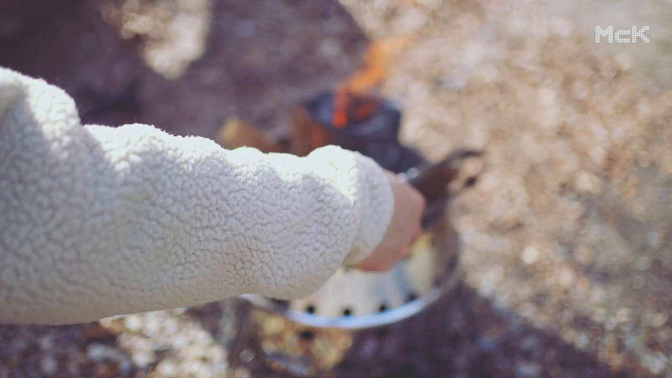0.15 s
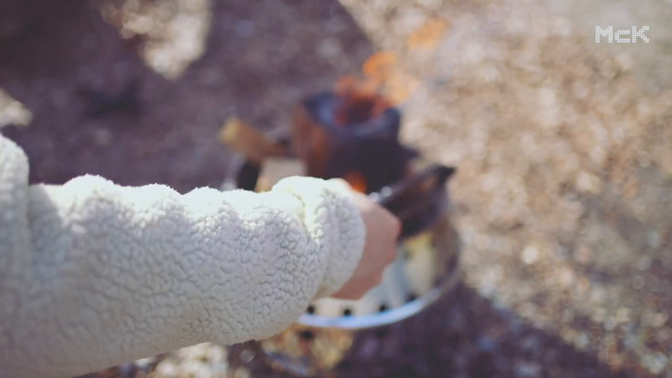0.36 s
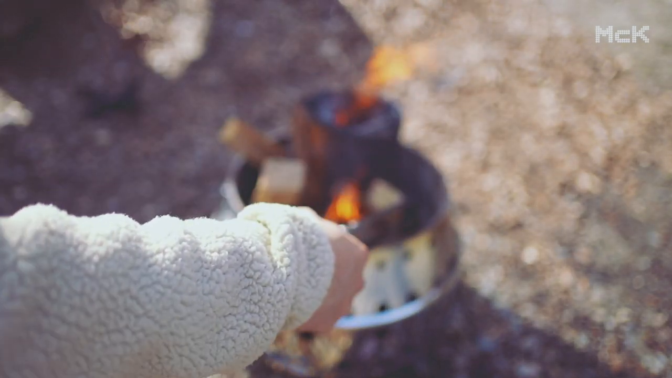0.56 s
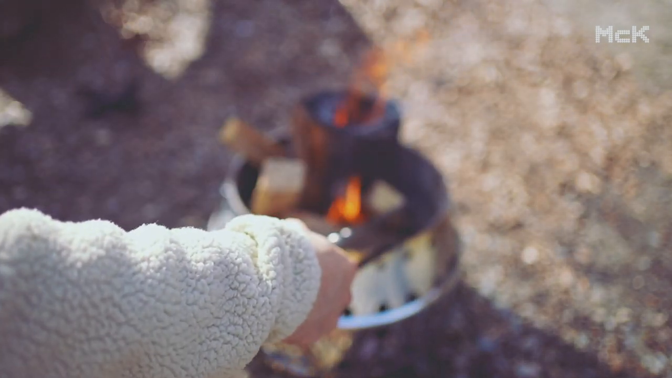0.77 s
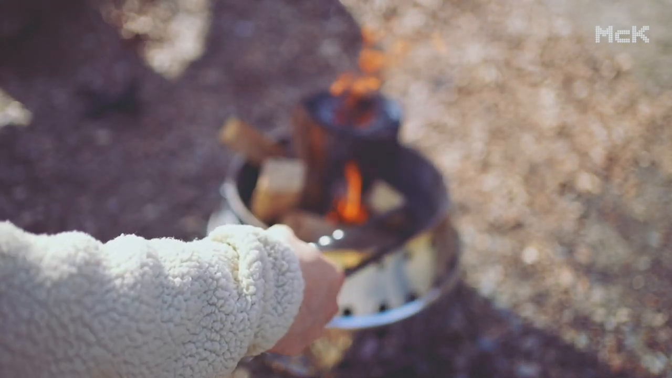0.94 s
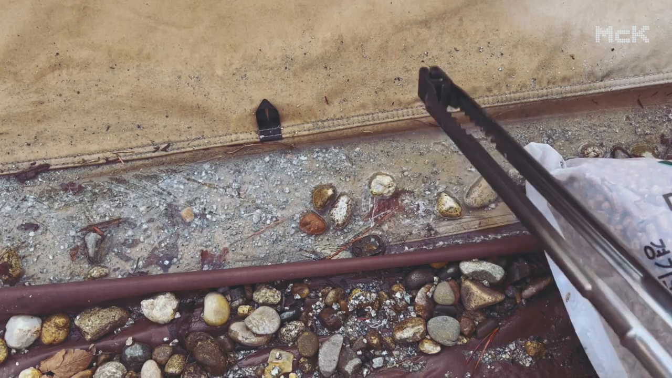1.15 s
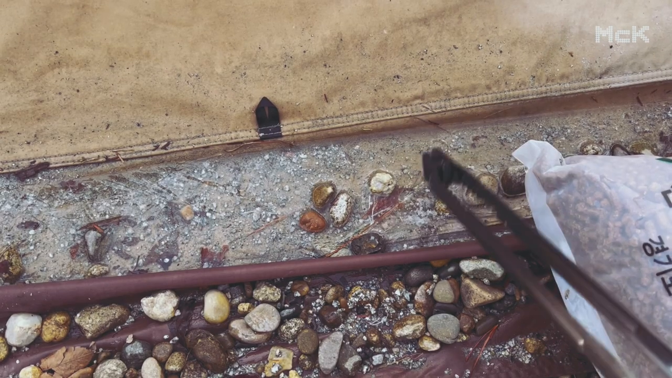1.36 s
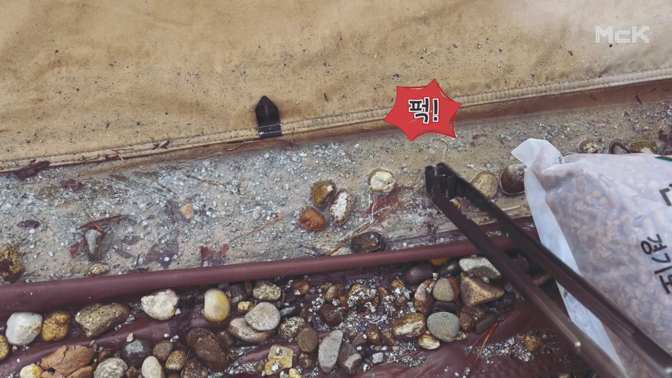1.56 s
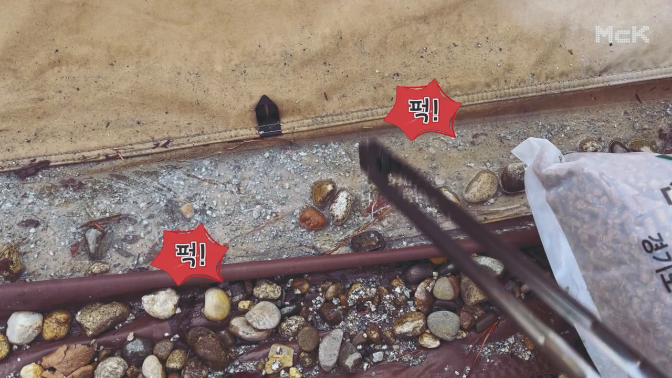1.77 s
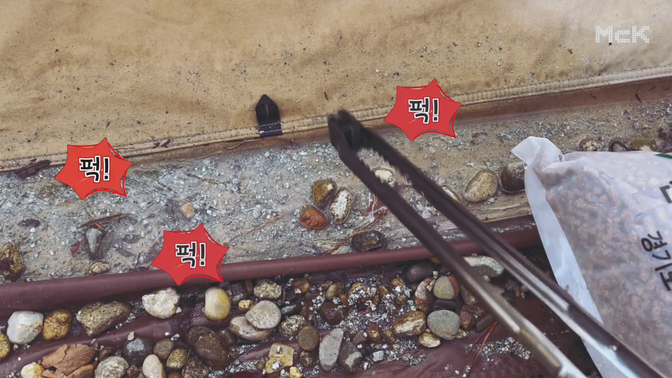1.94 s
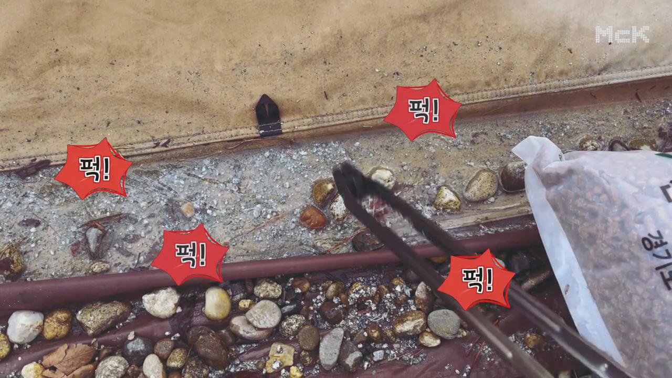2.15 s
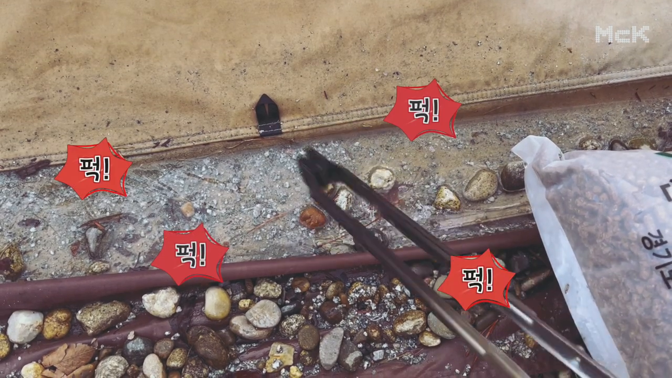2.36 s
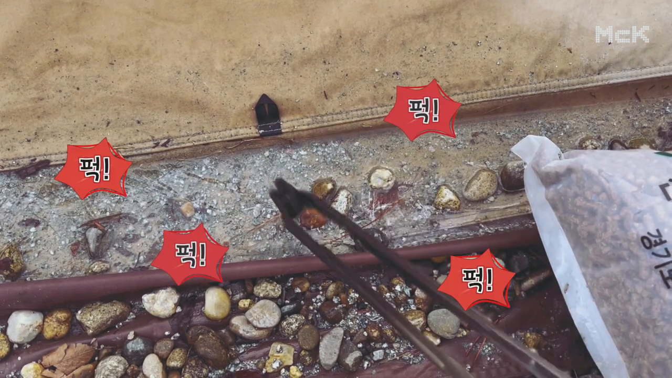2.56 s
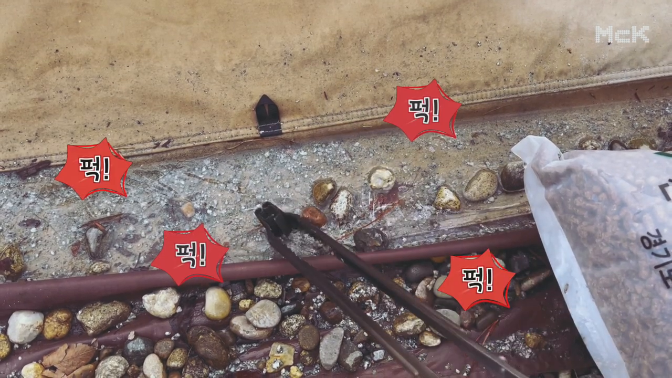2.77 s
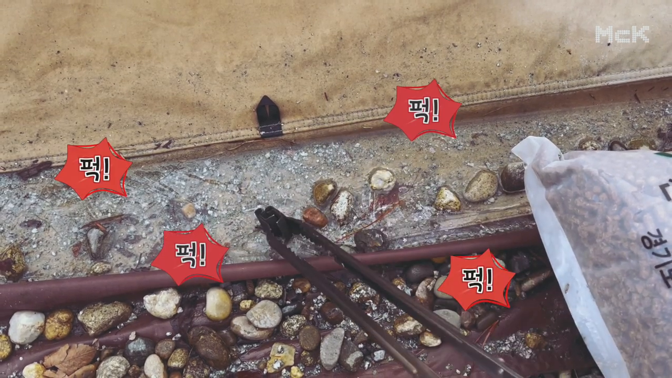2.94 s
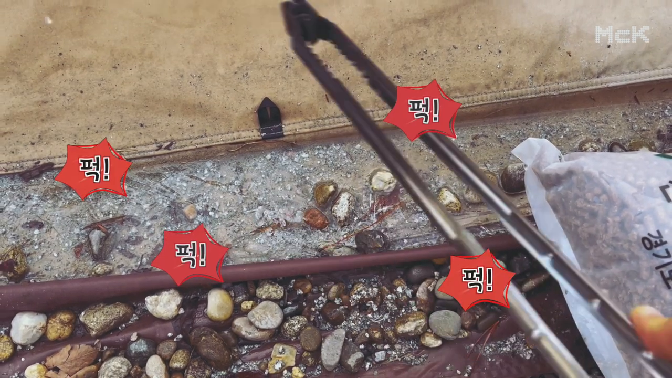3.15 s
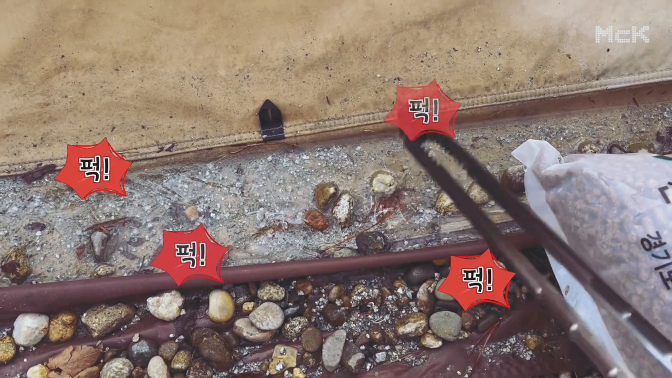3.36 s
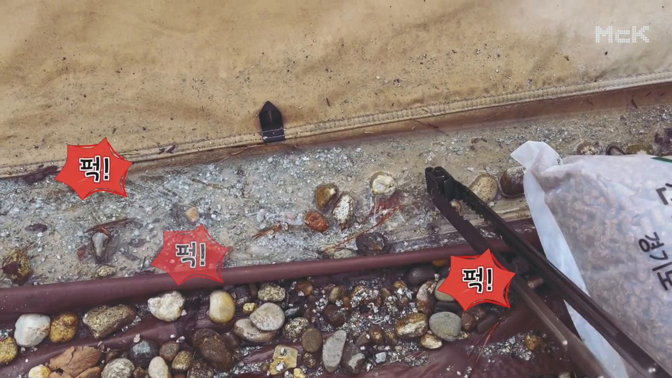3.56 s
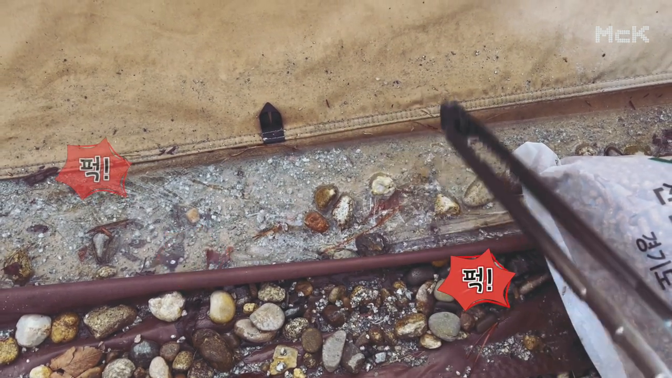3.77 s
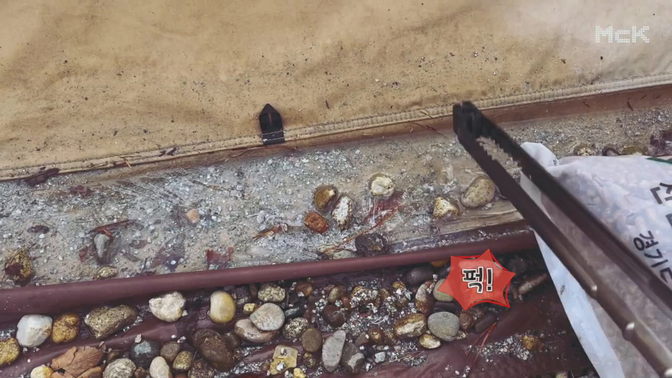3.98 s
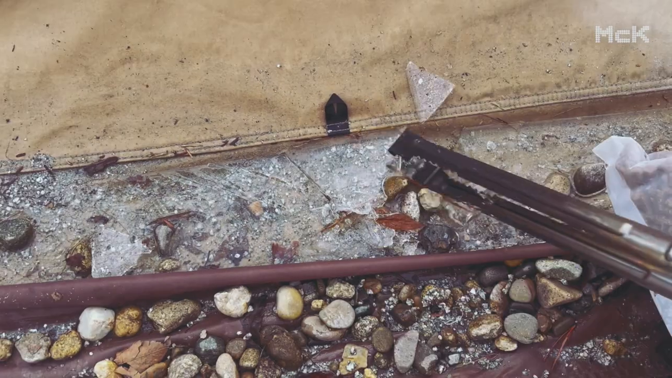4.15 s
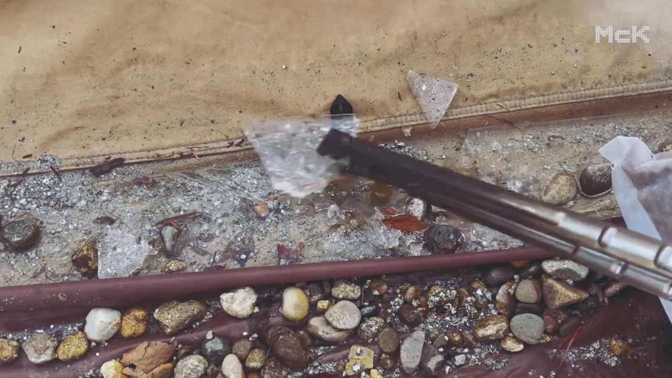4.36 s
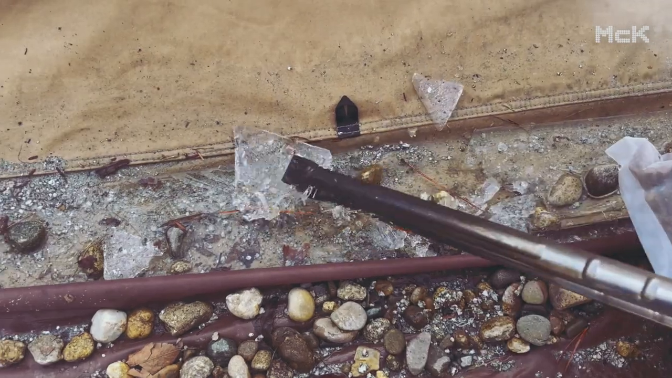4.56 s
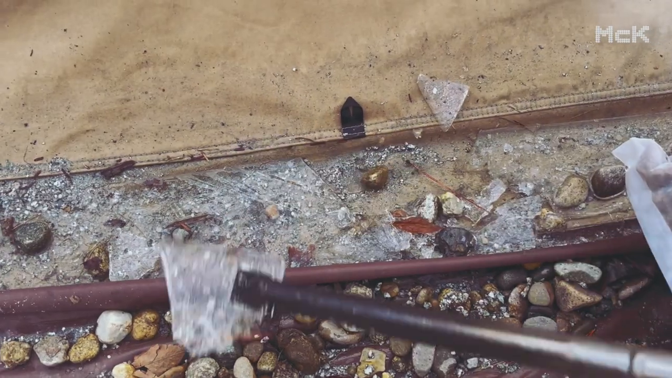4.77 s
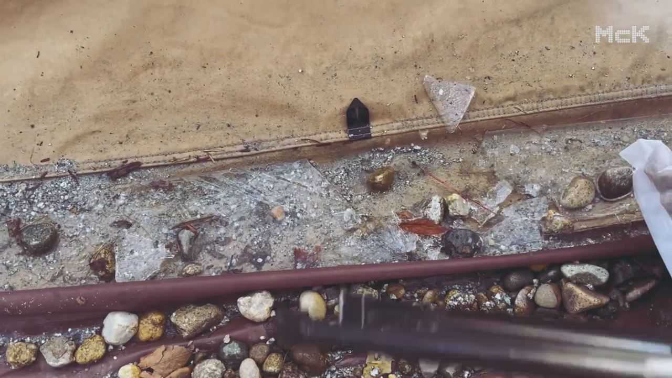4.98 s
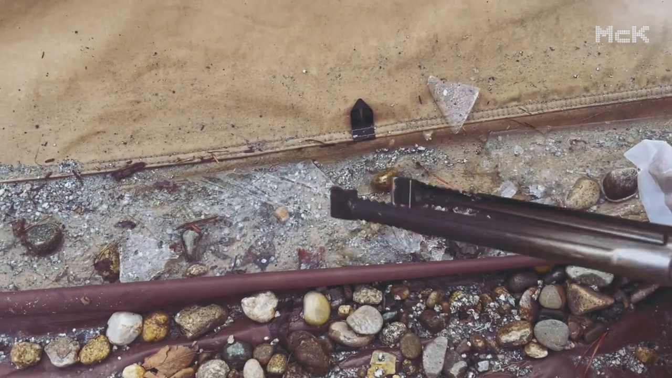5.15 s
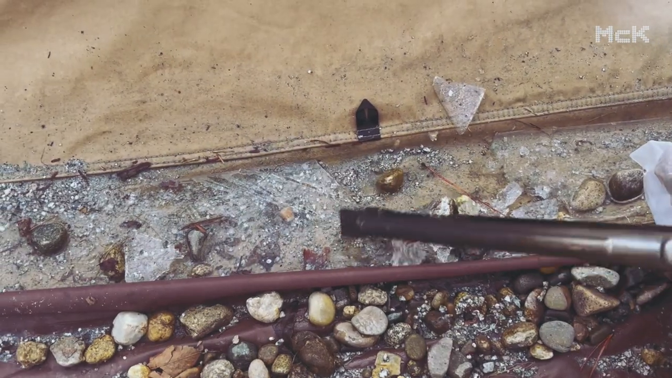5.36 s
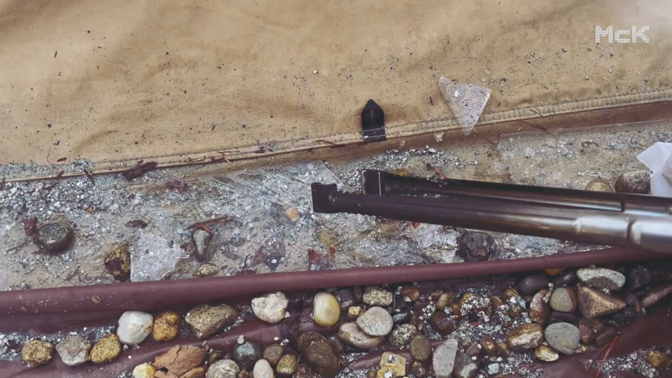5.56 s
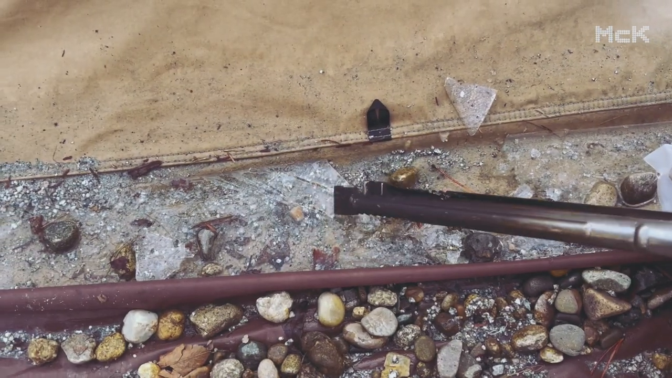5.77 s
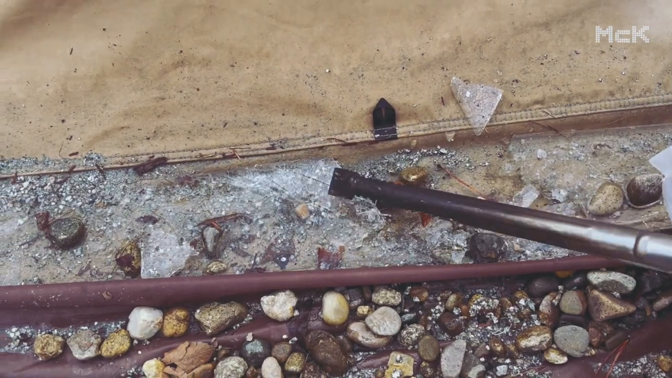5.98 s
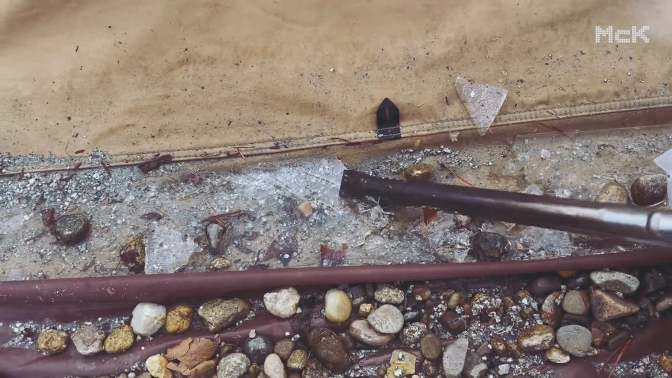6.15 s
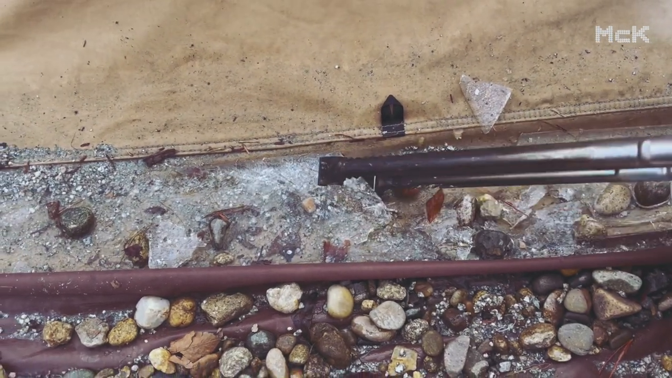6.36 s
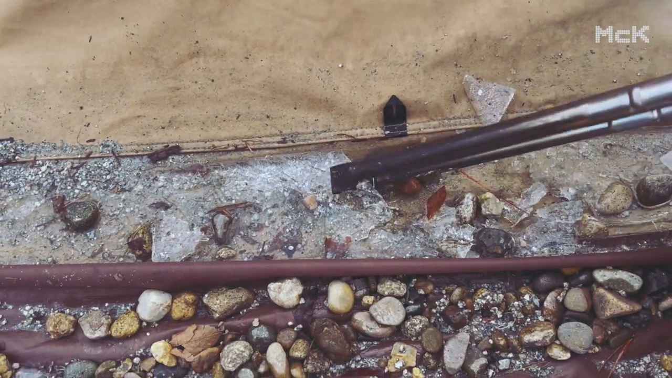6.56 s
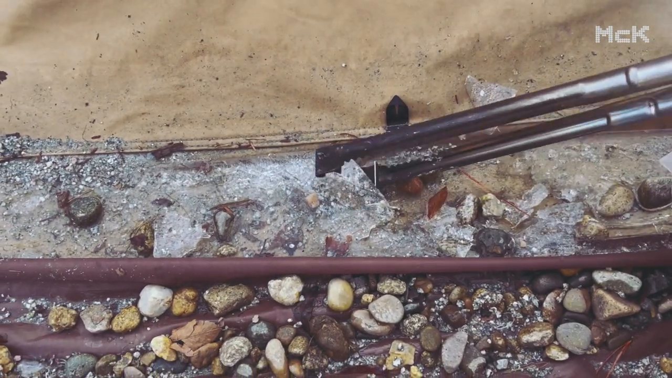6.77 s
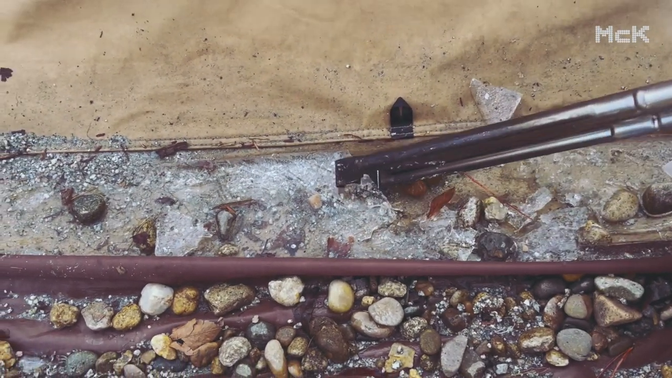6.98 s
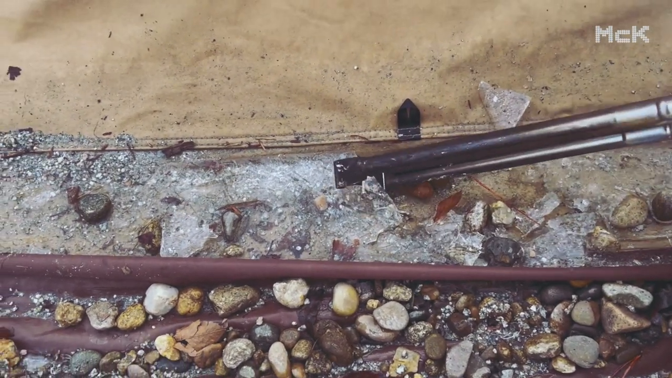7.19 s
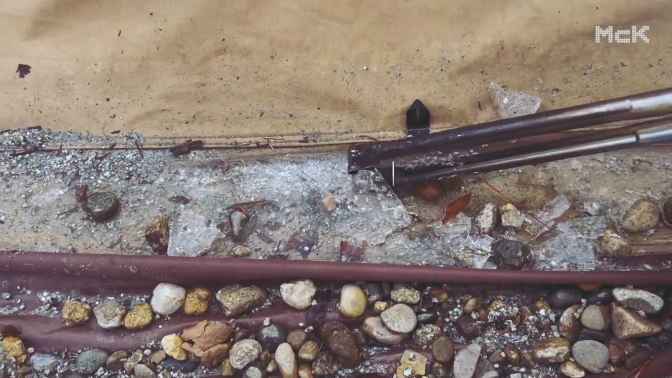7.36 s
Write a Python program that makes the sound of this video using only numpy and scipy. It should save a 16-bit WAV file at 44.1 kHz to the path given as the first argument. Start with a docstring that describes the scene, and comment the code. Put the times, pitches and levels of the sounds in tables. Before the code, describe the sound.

A small wood fire outdoors burns in the centre throughout, with low soft rumble, faint hiss and irregular pops; the sharpest snaps come near 1.9 and 6.3 seconds. From 0.15 to 0.7 steel tongs stir charcoal in a metal stove: short dry rasps with hollow, sliding notes, and one high clink at 0.26. From 1.13 to 3.74 the tongs strike ice close by, slightly right: bright, hard, quickly damped clacks roughly every quarter second, each with tiny chattering rebounds, an icy crack and a small ground thud. From 4.1 the action turns to raking: crunchy scrape and clicks until 4.4, a cracking nudge and slippery squeak around 4.8 to 5.05, gritty scrapes to 5.8, a clearer tick and crunch near 6.1, then faint scraping and small icy ticks to the end at about 7.4. Close stereo microphone, dry, with slight bright scatter from tent fabric.

```python
"""Stove fire and tongs on ice

A wood fire rumbles, hisses and pops dead centre throughout: shaped noise and short noise bursts.
Steel tongs first stir the stove, by stick-slip friction through hollow resonances, and clink once.
They then knock a strip of ice apart along a tent edge, by impacts on damped modes, and rake the shards
by friction on the same modes. The ice work is near, a little to the right, with the tent wall's scatter.
"""
import sys
import numpy as np
from scipy import signal
from scipy.fft import rfft, irfft, next_fast_len
from scipy.io import wavfile
from scipy.ndimage import uniform_filter1d, map_coordinates

SR = 44100
rng = np.random.default_rng(int(sys.argv[2]) if len(sys.argv) > 2 else 0)


def unload_audio(sound):
    """Save the sound as a 16-bit wav file, at the path given as the first command line argument."""
    columns = np.transpose(np.atleast_2d(sound))
    # keep every value between -1 and 1, then stretch to whole-number steps
    steps = np.round(np.clip(columns, -1, 1) * 32767)
    wavfile.write(sys.argv[1], SR, steps.astype(np.int16))


N = 327222
AFTER = np.arange(SR // 8) / SR  # seconds after an impact
FRONT = 260  # samples, about 6 ms, over which an impact has rms 1
TAIL_DB = -28  # level of the slow tail in every burst


def amp(db):
    """Decibel law: level to amplitude ratio."""
    return 10 ** (np.asarray(db) / 20)


def unit(x):
    """Normalisation to rms 1."""
    return x / np.sqrt(np.mean(x ** 2) + 1e-20)


def along(points, hz):
    """Logarithmic frequency scale: interpolate (Hz, value) points along it."""
    f, v = np.transpose(points)
    return np.interp(np.log(hz + 1), np.log(f + 1), v)


def curves(rows):
    """Level envelope: one gain per sample from (s, dB) rows."""
    s, db = np.transpose(rows)
    return amp(np.interp(np.arange(N) / SR, s, db))


def wobble(rate):
    """Slow random modulation: a smooth curve with rate knots a second."""
    knots = rng.standard_normal(int(N * rate / SR) + 4)
    return map_coordinates(knots, [np.arange(N) * rate / SR])


def filtered(x, response):
    """Linear filtering: the spectrum of x times a complex response of frequency."""
    m = next_fast_len(N + 8192)
    return irfft(rfft(x, m) * response(np.fft.rfftfreq(m, 1 / SR)), m)[..., :N]


def resonant(modes):
    """Modal superposition: the causal response of (Hz, width Hz, dB) resonances with alternating signs."""
    def response(f):
        total = 0
        for k, (hz, width, db) in enumerate(modes):
            total = total + (-1) ** k * amp(db) * 1j * f * width / (hz * hz - f * f + 1j * f * width)
        return total
    return response


def grit(rate, spread_db, rub=0):
    """Stick-slip friction: uneven random slips, rate a second, over a share of steady rubbing noise."""
    sizes = amp(spread_db * np.minimum(rng.exponential(size=N), 2.5))
    slips = (rng.random(N) < rate / SR) * sizes
    envelope = unit(signal.lfilter([1], [1, -.975], slips)) + abs(rub)
    return unit(envelope * rng.standard_normal(N))


def burst(lo_hz, hi_hz, t60):
    """Transient decay: a band of noise with a spiky front, a body dying in t60 and a weak slow tail."""
    spike = amp(7 - 60 * AFTER / 0.0025)
    body = amp(-60 * AFTER / t60)
    tail = amp(TAIL_DB - 60 * AFTER / 0.14)
    shape = (spike + body + tail) * (1 - np.exp(-AFTER / 0.00023))
    band = signal.butter(2, [lo_hz, min(hi_hz, .45 * SR)], "bandpass", fs=SR, output="sos")
    x = signal.sosfilt(band, shape * rng.standard_normal(len(AFTER)))
    return x / np.sqrt(np.mean(x[:FRONT] ** 2))


def ringing(modes, spread_db, detune):
    """Modal decay: damped (Hz, dB, t60) modes; grip and spot struck weight and shift each one anew."""
    x = 0
    for hz, db, t60 in modes:
        envelope = amp(db + rng.normal(0, spread_db) - 60 * AFTER / t60)
        x = x + envelope * np.sin(2 * np.pi * hz * rng.normal(1, detune) * AFTER)
    x = x * (1 - np.exp(-AFTER / 0.00013))
    return x / np.sqrt(np.mean(x[:FRONT] ** 2))


def patchy(x, depth_db):
    """Time-varying filtering: a random gain field over time and frequency keeps the colour changing."""
    z = signal.stft(x, nperseg=256)[2]
    field = uniform_filter1d(rng.standard_normal(z.shape), size=6, axis=0)
    field = uniform_filter1d(field, size=8, axis=1)
    return unit(signal.istft(z * amp(depth_db * unit(field)), nperseg=256)[1][:N])


def strokes(rows, sag_db, fade):
    """Friction envelope: quick bite, sag, then decay with time constant fade; one per dB column."""
    t, gains = np.arange(N) / SR, 0
    for start, end, *db in rows:
        shape = np.clip((t - start) / 0.017, 0, 1) * np.exp(-np.clip(t - end, 0, None) / fade)
        sag = amp(-sag_db * np.clip((t - start) / (end - start), 0, 1))
        gains = gains + np.outer(amp(db), shape * sag)
    return gains


def add(track, s, sound):
    """Superposition: mix a sound into the track at s seconds."""
    track[round(s * SR):][:len(sound)] += sound


def wide_floor():
    """Uncorrelated noise: a faint wide low rumble and a narrow 10 kHz hiss, left and right, from 1.11 s."""
    floor = filtered(rng.standard_normal((2, N)), resonant([(90, 230, 4.5), (10400, 1300, -2)]))
    return amp(-66.5) * unit(floor) * (np.arange(N) > 1.11 * SR)


# Clear fire pops. Each row: start in seconds, snap level in dB, brightness in dB against the snap.
FIRE_POPS = [(0.1144, -30, -5), (0.2015, -39, -13.5), (0.365, -50, -44), (0.5503, -48, 10),
             (0.5945, -38.5, 8), (0.919, -37.5, 1), (0.9746, -36.5, -8.5), (1.082, -28.5, -15.5),
             (1.1985, -47.5, 4), (1.228, -39.5, -14.5), (1.2826, -37, 5.5), (1.389, -49.5, 2.5),
             (1.4662, -33, -16.5), (1.665, -39.5, 7.5), (1.7634, -26.5, -4), (1.818, -46, 0.5),
             (1.9084, -14.5, -2.5), (2.099, -29.5, 3.5), (2.121, -46.5, 9), (2.4394, -28, -7),
             (2.457, -48, 5.5), (2.7587, -42.5, -3), (2.8483, -47.5, 15.5), (2.987, -25, -1),
             (3.055, -42, -7.5), (3.3011, -48.5, -4.5), (3.341, -47, 1.5), (3.353, -44.5, 3),
             (3.852, -39, 0.5), (3.8936, -35.5, -0.5), (3.9637, -45.5, -17), (3.984, -40, 2.5),
             (4.519, -29.5, -29.5), (4.619, -41, -8), (4.738, -36.5, -8), (4.895, -40, 6),
             (4.9029, -39.5, 3.5), (5.0653, -36, -6.5), (5.097, -23.5, 0), (5.4542, -30.5, -6),
             (5.914, -42.5, -7), (6.193, -39.5, -15.5), (6.3387, -16.5, -5.5), (6.3812, -26, -0.5),
             (6.404, -29.5, -1.5), (6.534, -51, -49), (6.5982, -35, -5), (6.745, -41.5, 4.5),
             (7.0045, -36, 3), (7.2645, -41, -25)]
# Flame strength. Each row: time in seconds, rumble level in dB.
FLAME_LEVEL = [(0.0, -47.5), (7.42, -42.5)]
# Spectrum of the flame rumble. Each row: frequency in Hz, relative density in dB per Hz.
RUMBLE_SPECTRUM = [(15, -45), (25, -12.5), (59, 1.5), (98, 2.5), (400, -19.5), (880, -120)]
# Spectrum of the fire hiss. Each row: frequency in Hz, relative density in dB per Hz.
HISS_SPECTRUM = [(180, -23), (300, -9), (758, -12.5), (927, -21.5), (2630, -28), (15200, -39.5),
                 (16800, -58)]


def fire():
    """Impulsive radiation: bursting wood pockets snap over noise-shaped rumble, hiss and fine crackle."""
    pops = np.zeros(N + SR)
    for s, snap_db, bright_db in FIRE_POPS:
        add(pops, s, amp(snap_db) * burst(1370, 5370, 0.015))
        add(pops, s, amp(snap_db + bright_db) * burst(4100, 11900, 0.0089))
        thump_db = snap_db - 8.0 - 0.56 * bright_db  # dull pops thump more
        add(pops, s, amp(thump_db) * burst(355, 873, 0.016))
    rumble = unit(filtered(rng.standard_normal(N), lambda f: amp(along(RUMBLE_SPECTRUM, f))))
    hiss = filtered(rng.standard_normal(N), lambda f: amp(along(HISS_SPECTRUM, f)))
    crackle = filtered(grit(rate=36, spread_db=9.5), resonant([(5040, 4700, 0)]))
    out = pops[:N] + curves(FLAME_LEVEL) * rumble
    out += amp(-54.0) * patchy(hiss, depth_db=5.0)
    return out + amp(-57.5) * patchy(crackle, depth_db=0.5)


# Strokes of the tongs in the stove. Each row: start in seconds, end in seconds, rasp level in dB,
# hollow note level in dB, hollow pitch in Hz, resonance width in Hz; levels are before the sag.
STOVE_STROKES = [(0.146, 0.166, -69, -33, 1640, 91.5), (0.195, 0.235, -43, -32, 1660, 130),
                 (0.226, 0.28, -40.5, -29.5, 1510, 1530), (0.487, 0.6, -39, -67, 1110, 900),
                 (0.571, 0.641, -36.5, -29, 1070, 302)]
# Spectrum of steel on charcoal. Each row: frequency in Hz, relative level in dB.
RASP_SPECTRUM = [(1500, -9), (15800, -18.5), (16800, -89)]
# Modes of the tongs, lowest first. Each row: frequency in Hz, relative level in dB.
STEEL_MODES = [(5405, 2), (6400, -11.5), (7100, -6.5), (8560, -1), (8860, 0.5), (9480, -3.5), (9938, 8),
               (11030, 7.5), (11400, 6), (14400, -5)]
CLINK_S, CLINK_DB = .2553, -20  # the tongs touch the stove rim


def stirring():
    """Friction-driven resonance: steel rasps on charcoal, the shell answers hollow, the tongs clink once."""
    rasp = filtered(grit(rate=890, spread_db=-4.5, rub=2.6), lambda f: amp(along(RASP_SPECTRUM, f)))
    rasp_gain = strokes([row[:3] for row in STOVE_STROKES], sag_db=11.5, fade=0.1)[0]
    out = rasp_gain * patchy(rasp, depth_db=1.5)
    for start, end, _, db, hz, width in STOVE_STROKES:
        shell = resonant([(hz, width, 0), (hz, hz, -14)])
        note = filtered(grit(rate=230, spread_db=-19.0, rub=1.6), shell)
        out += strokes([(start, end, db)], sag_db=14.5, fade=0.035)[0] * unit(note)
    ring = ringing([(hz, db, .08) for hz, db in STEEL_MODES[1:]], spread_db=8, detune=0.0034)
    add(out, CLINK_S, amp(CLINK_DB) * (burst(10000, 17000, .06) + 0.38 * ring))
    return out


# Strokes through the shards, and one long faint bed of scraping under the later ones. Each row: start in
# seconds, end in seconds, crunch level in dB before the wobble, steel rasp in dB against the crunch.
SHARD_STROKES = [(4.097, 4.253, -42.5, 2), (4.306, 4.408, -49, -3), (4.79, 5.063, -55, 2.5),
                 (5.125, 5.159, -42.5, 1.5), (5.234, 5.467, -48.5, -3.5), (5.709, 5.786, -45, -2),
                 (6.102, 6.15, -38, 0), (5.466, 7.34, -55, -2), (7.136, 7.196, -49.5, -16),
                 (7.332, 7.5, -51, 3.5)]
# Wet shards slide and sing. Each row: start in seconds, end in seconds, level in dB before the sag,
# pitch in Hz, width in Hz of the resonance, which is applied twice.
SHARD_SQUEAKS = [(4.8, 5.045, -48, 2600, 900), (5.18, 5.245, -55, 1370, 60)]
# Modes of the ice shards. Each row: frequency in Hz, width in Hz, relative level in dB.
ICE_MODES = [(1740, 195, -8.5), (2100, 780, 8), (3420, 300, -3.5), (4430, 147, -10), (5340, 170, -17)]
RAKE_GROUND_DB = -4  # gravel rumble against the ice part of the crunch


def raking():
    """Stick-slip excitation: small slips on the shards drive the steel, the ice and the gravel under it."""
    rows = [(start, end, db + steel_db, db) for start, end, db, steel_db in SHARD_STROKES]
    rasp_gain, crunch_gain = strokes(rows, sag_db=0.0, fade=0.011) * amp(1.15 * wobble(35))
    damped = [(hz, 260, db) for hz, db in STEEL_MODES]  # contact with the ice widens each mode
    steel = filtered(grit(rate=460, spread_db=4, rub=0.44), resonant(damped))
    slips = grit(rate=290, spread_db=5.5, rub=0.52)
    ice = filtered(slips, resonant(ICE_MODES + [(3700, 6600, 2.4)]))
    gravel = unit(filtered(slips, resonant([(530, 410, 0)])))
    out = rasp_gain * patchy(steel, depth_db=4.0)
    out += crunch_gain * (patchy(ice, depth_db=6.0) + amp(RAKE_GROUND_DB) * gravel)
    for start, end, db, hz, width in SHARD_SQUEAKS:
        note = unit(filtered(slips, lambda f: resonant([(hz, width, 0)])(f) ** 2))
        out += strokes([(start, end, db)], sag_db=7, fade=0.017)[0] * note
    return out


# Hard blows on the ice. Each row: start in seconds, steel ring in dB, ice crack in dB, ground thud in dB,
# change of the lowest steel mode in dB, gap to the first rebound in seconds, ring of that rebound in dB.
ICE_BLOWS = [(1.1293, -12, -15.5, -17.5, -18, 0.013, -8), (1.5, -14, -22, -15, -6, 0.018, -9),
             (1.542, -23, -28, -23.5, -7, 0.011, -54), (1.739, -12.5, -25, -27.5, -24, 0.0063, -47),
             (1.978, -9, -21, -20.5, -14, 0.0094, -11), (2.199, -12.5, -24, -29, 3, 0.0075, -14.5),
             (2.4156, -9.5, -24, -28, -8.5, .004, -22), (2.653, -13.5, -19.5, -17, -16, 0.006, -18.5),
             (2.867, -11.5, -22, -25.5, -16, 0.0105, -15), (3.1609, -7.5, -23, -28.5, 14, 0.02, -12),
             (3.4673, -10.5, -24, -22.5, -14, 0.01, -10.5), (3.7388, -10, -27.5, -21.5, -9, 0.0089, -12)]
# The tips knock loose pieces. Each row: start in seconds, steel ring in dB, ice crack in dB.
TIP_NUDGES = [(2.924, -40, -57), (3.276, -45, -42.5), (3.583, -32, -71), (4.169, -28, -39.5),
              (4.178, -26.5, -32.5), (4.2872, -46, -38.5), (4.3033, -23, -26), (4.82, -30, -30),
              (4.838, -27, -15.5), (5.124, -36, -34.5), (5.37, -34, -41), (5.558, -40, -43),
              (5.7213, -37, -36), (5.769, -32, -39), (6.0442, -20, -31), (6.095, -46.5, -28.5),
              (6.7683, -41.5, -24.5), (6.8554, -42.5, -24.5), (7.0677, -44.5, -26), (7.367, -34.5, -34.5)]
REBOUND_CRACK_DB, REBOUND_THUD_DB = -12, -25  # first rebound against its blow
LATER_DB, LATER_GAP_S = -16, 0.012  # each later rebound loses this much and follows at this pace
GLANCING_DB = -18.5  # a rebound or nudge hardly wakes the lowest mode
NUDGE_THUD_DB = -15  # thud of a nudge against its crack


def contacts():
    """Repeated impact: nudges, and blows with three rebounds each, as (s, ring, crack, thud, low mode dB).

    The first rebound has its own ring level; the later ones weaken.
    """
    rows = [(s, ring_db, crack_db, crack_db + NUDGE_THUD_DB, GLANCING_DB)
            for s, ring_db, crack_db in TIP_NUDGES]
    for s, ring_db, crack_db, thud_db, low_db, gap, again_db in ICE_BLOWS:
        rows.append((s, ring_db, crack_db, thud_db, low_db))
        for k in range(3):
            loss_db = k * LATER_DB
            rows.append((s + gap + k * LATER_GAP_S, again_db + loss_db,
                         crack_db + REBOUND_CRACK_DB + loss_db,
                         thud_db + REBOUND_THUD_DB + loss_db, low_db + GLANCING_DB))
    return rows


LOW_MODE_T60_S = 0.047  # the lowest steel mode lasts
FREE_RING_DB, FREE_RING_T60_S = -30, 0.13  # a faint part of the ring escapes the heavy damping


def steel_ring(low_db):
    """Modal damping: short upper modes, a lasting lowest mode, a faint free ring and chattering arms."""
    modes = []
    for hz, db in STEEL_MODES:
        if hz < 6000:
            modes.append((hz, db + low_db, LOW_MODE_T60_S))
        else:
            modes.append((hz, db, rng.uniform(0.011, 0.04)))
    ring = ringing(modes, spread_db=8.0, detune=0.002)
    free = [(hz, db, FREE_RING_T60_S) for hz, db, _ in modes]
    ring += amp(FREE_RING_DB) * ringing(free, spread_db=4.0, detune=0.00061)
    # the loose arms chatter against each other for a few milliseconds
    taps = np.r_[1, (rng.random(200) < .025) * rng.normal(0, .9, 200)]
    return signal.fftconvolve(ring + 0.76 * burst(8000, 11600, 0.011), taps / np.linalg.norm(taps))


def ice_crack(loose):
    """Fracture and resonance: a noise crack shared with the shard modes, loose being the ringing share."""
    slab = ringing([(hz, db, 9 / width) for hz, width, db in ICE_MODES], spread_db=1.0, detune=0.015)
    free = [(hz, 0, 2 * FREE_RING_T60_S) for hz, *_ in ICE_MODES]
    slab += amp(FREE_RING_DB) * ringing(free, spread_db=8, detune=0.01)
    return (1 - loose) * burst(1470, 5700, 0.03) + loose * slab


def blows():
    """Impact excitation: each contact rings the steel anew, cracks the ice and thuds into the ground."""
    out = np.zeros(N + SR)
    for s, ring_db, crack_db, thud_db, low_db in contacts():
        add(out, s, amp(ring_db - 3.5) * steel_ring(low_db))
        # a nudged loose shard rings; a hard blow just cracks
        loose = np.clip((crack_db - ring_db) / 24, .1, .9)
        add(out, s, amp(crack_db) * ice_crack(loose))
        add(out, s, amp(thud_db) * (burst(410, 1250, 0.018) + 0.46 * burst(124, 314, 0.034)))
    return out[:N]


# Level between the two microphone ports for a near source. Each row: frequency in Hz, left-right in dB.
PORT_LEVEL = [(300, -4.5), (7000, -6.5), (8000, 1)]
# Phase between the two ports. Each row: frequency in Hz, lead of the left in radians.
PORT_PHASE = [(300, -0.2), (2800, -0.8), (8100, -1), (10000, 2.5), (12100, 6.4), (15200, 12.4)]
NEAR_TOP_HZ = 12700  # low-pass corner


def near(x):
    """Two-port difference and scattering: level and phase differ; the tent wall answers short and bright."""
    x = signal.sosfilt(signal.butter(3, NEAR_TOP_HZ, fs=SR, output="sos"), x)  # the ports dull the top

    def port_pair(f):
        half = amp(along(PORT_LEVEL, f) / 2) * np.exp(.5j * along(PORT_PHASE, f))
        return half ** np.array([[1], [-1]])  # left, and its inverse on the right
    ports = filtered(x, port_pair)
    scatter = amp(-60 * AFTER / 0.072) * rng.standard_normal((2, len(AFTER)))
    wall = signal.lfilter([1, -1], [1, -.85], scatter)
    wall = wall / np.linalg.norm(wall[0])
    return ports + amp(-14.5) * signal.fftconvolve(x[None], wall, axes=1)[:, :N]


def scene():
    """Superposition of the wide floor, the fire, the stirring and the near work on the ice."""
    return wide_floor() + fire() + stirring() + near(raking() + blows())


TOP_HZ = 16900  # band limit


def record(dry):
    """Saturation and band limiting: peaks round off just under full scale, then the top is cut off."""
    soft = dry / (1 + np.abs(dry / .93) ** 8) ** (1 / 8)
    return filtered(soft, lambda hz: hz < TOP_HZ)


dry = scene()
out = record(dry)
unload_audio(out)
```